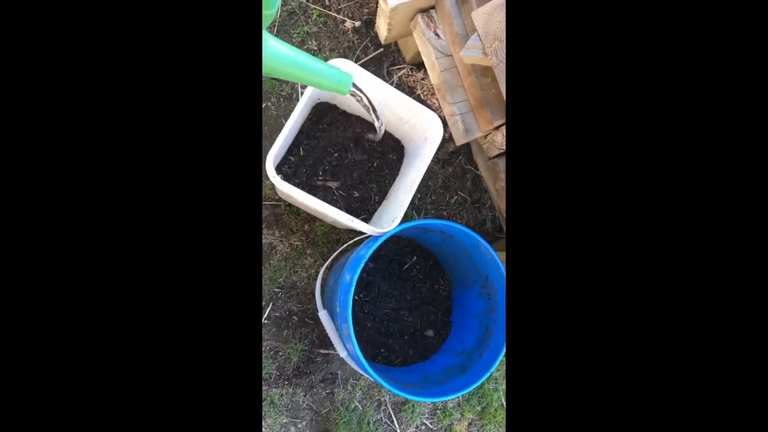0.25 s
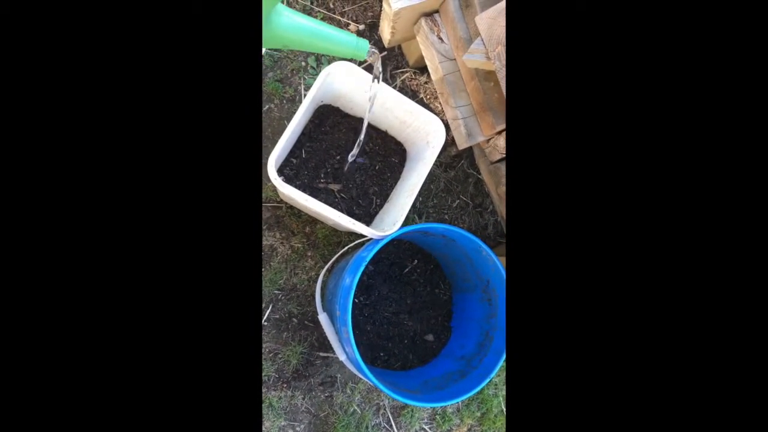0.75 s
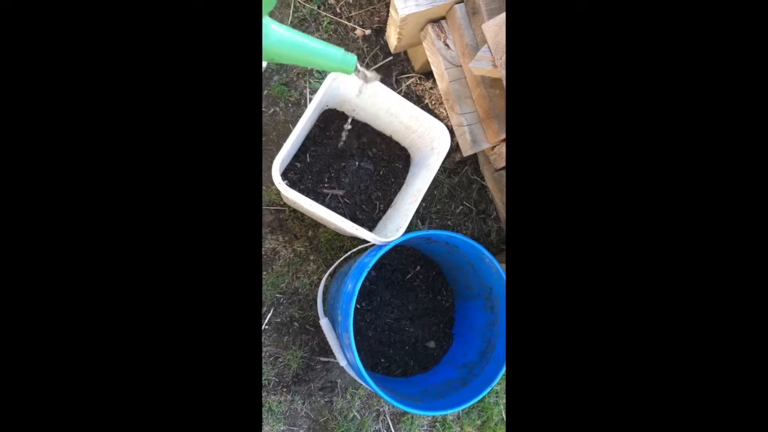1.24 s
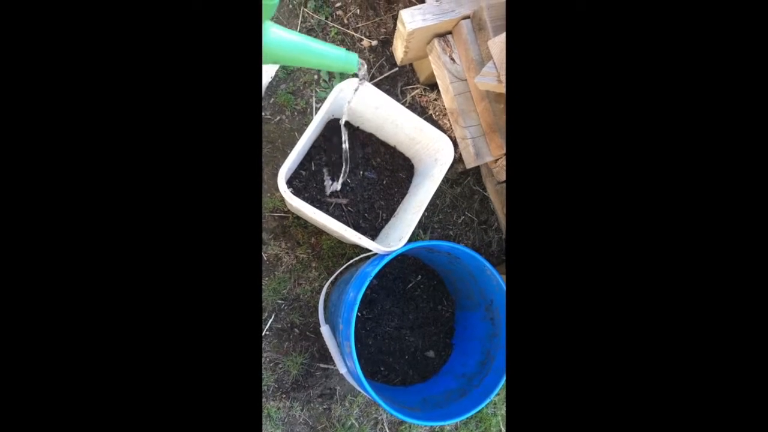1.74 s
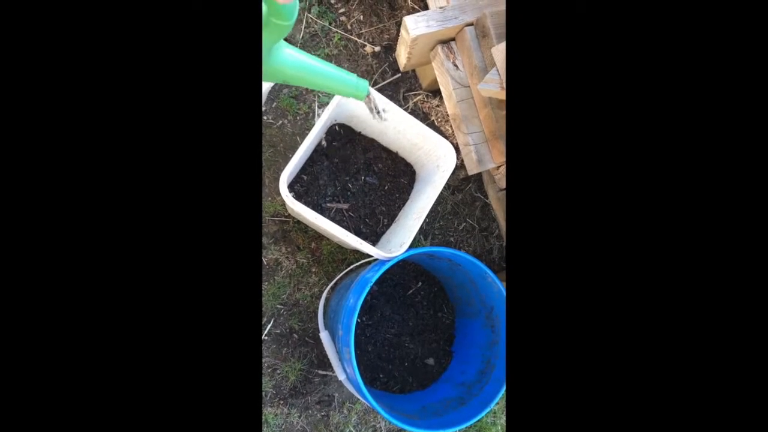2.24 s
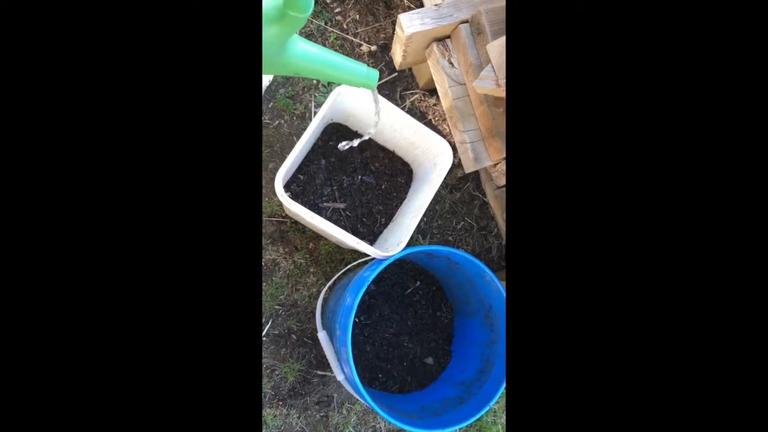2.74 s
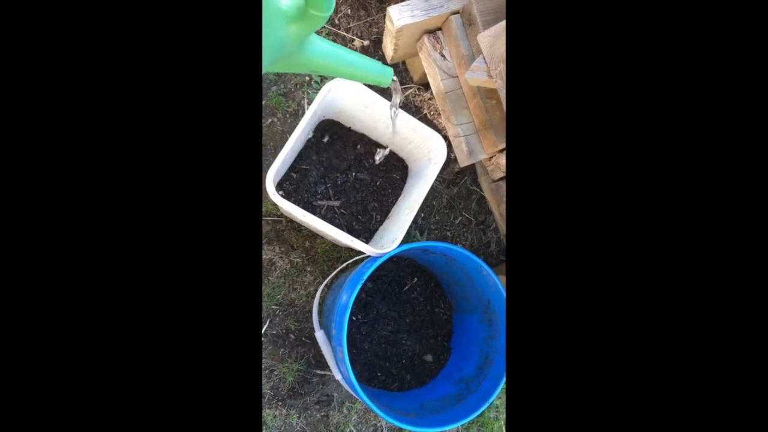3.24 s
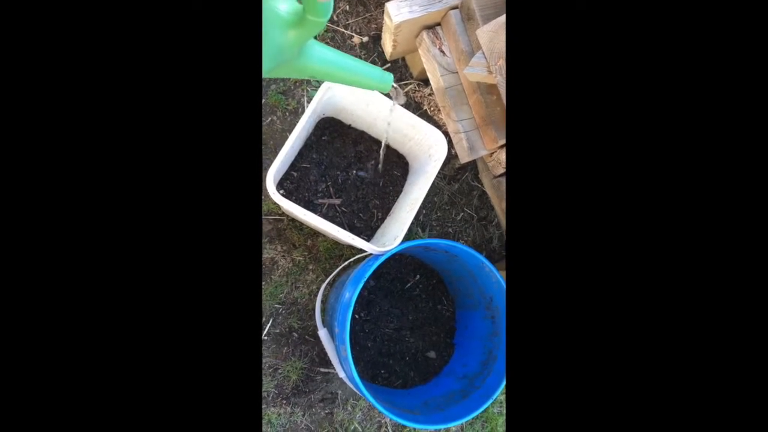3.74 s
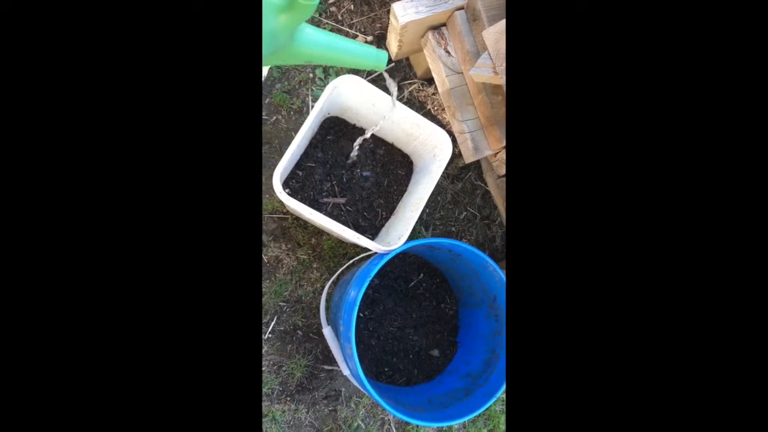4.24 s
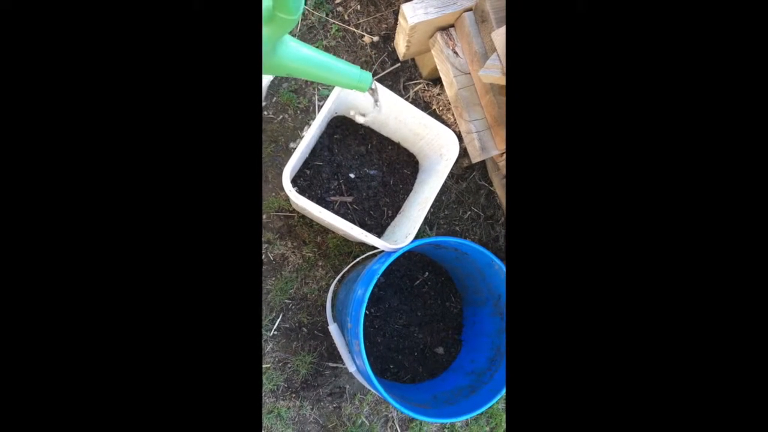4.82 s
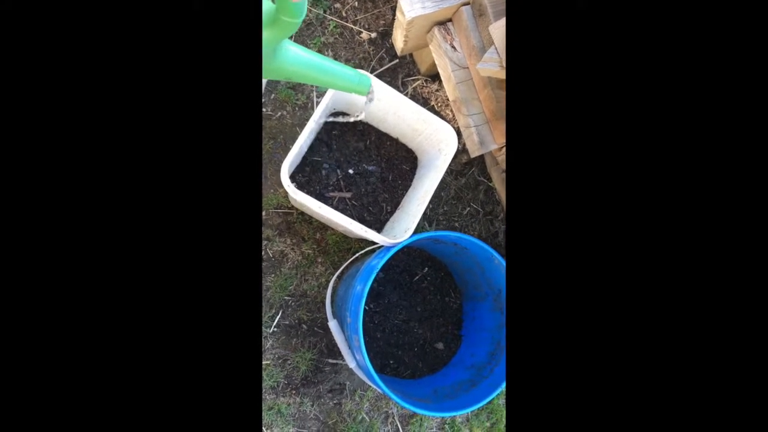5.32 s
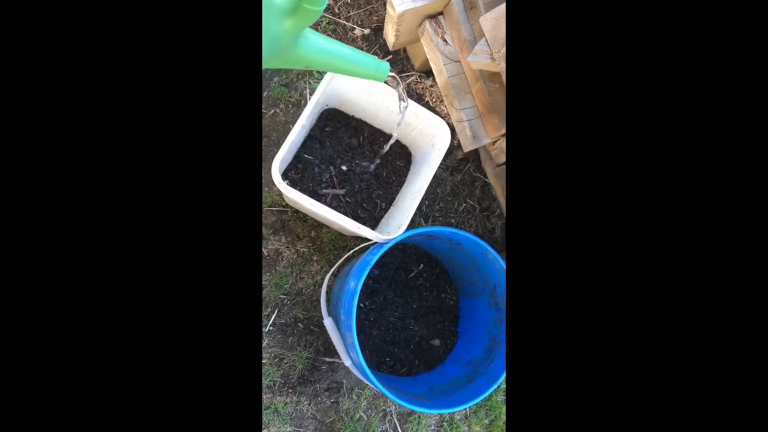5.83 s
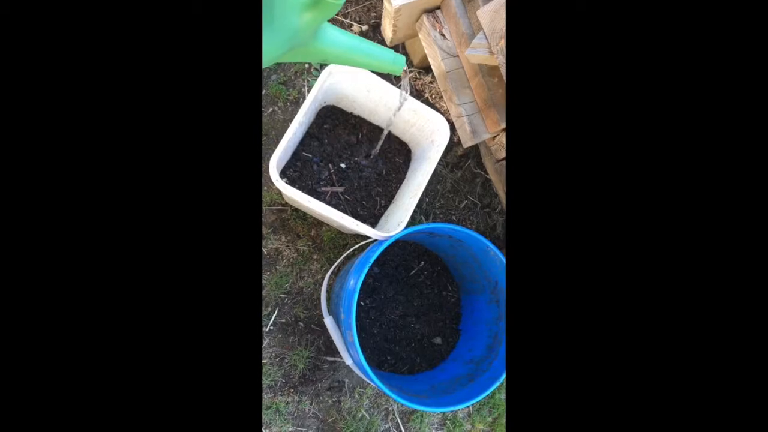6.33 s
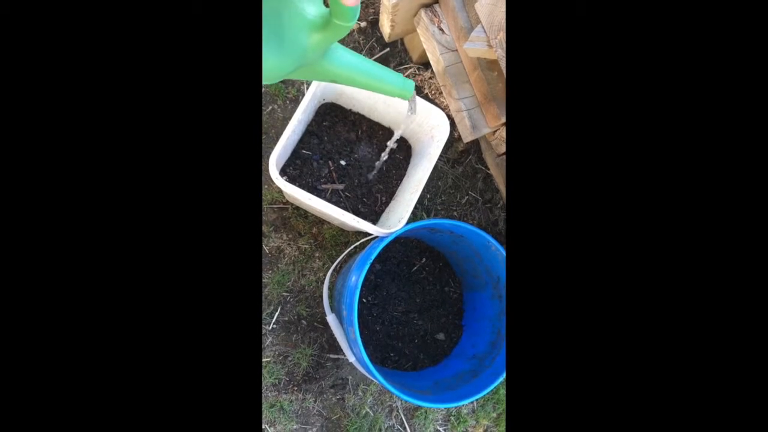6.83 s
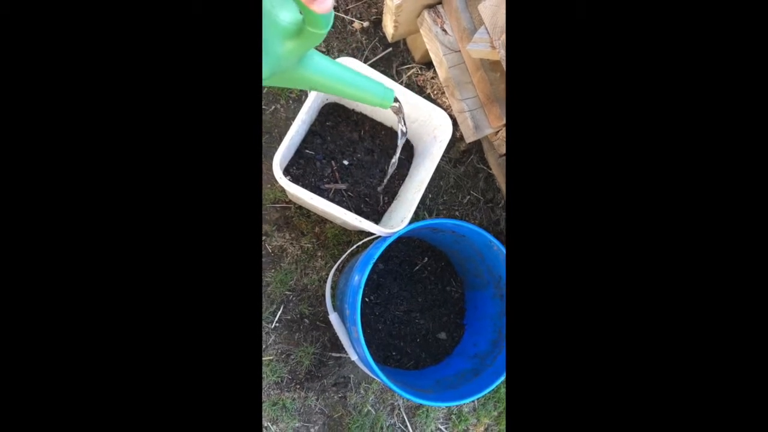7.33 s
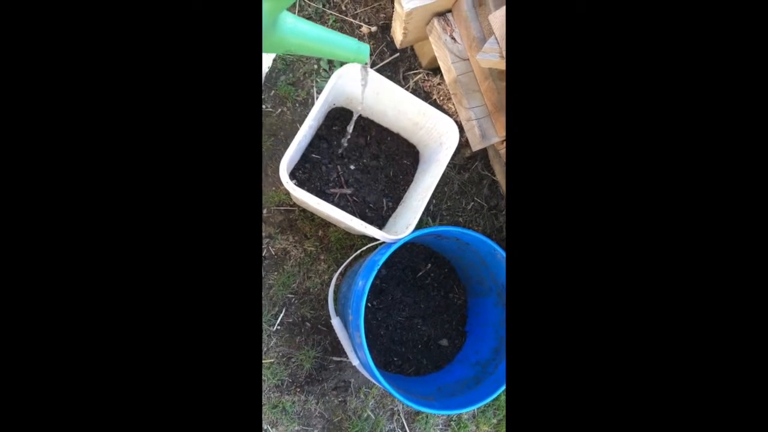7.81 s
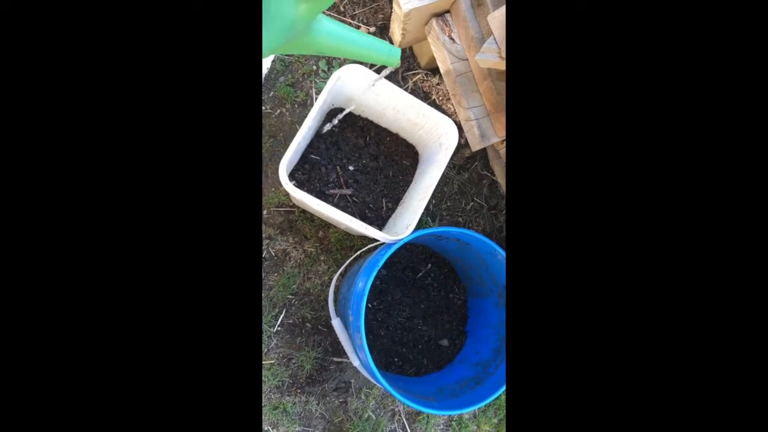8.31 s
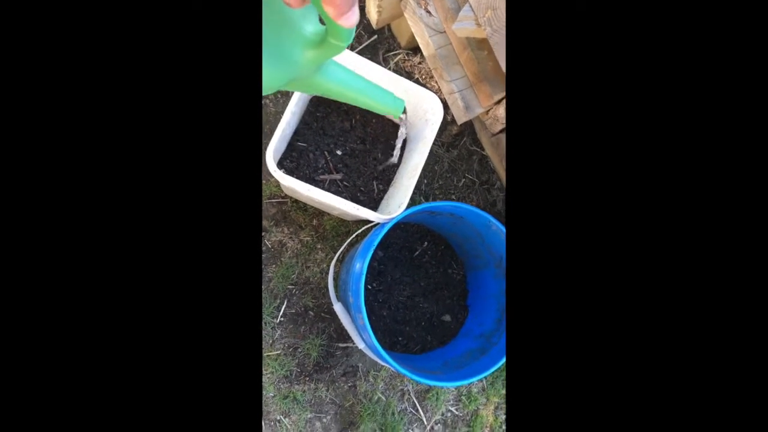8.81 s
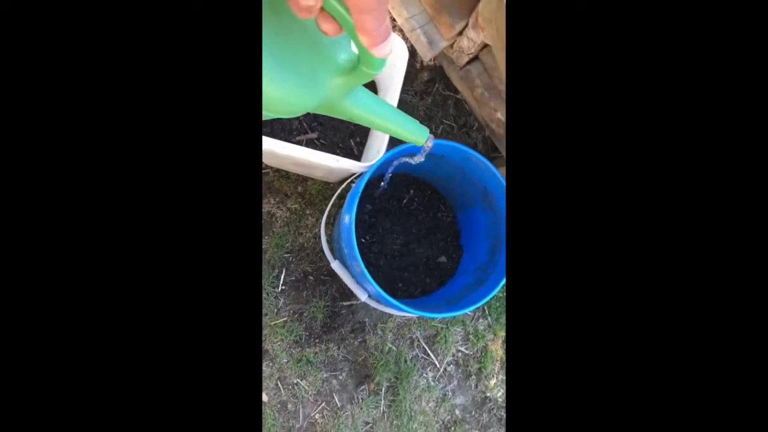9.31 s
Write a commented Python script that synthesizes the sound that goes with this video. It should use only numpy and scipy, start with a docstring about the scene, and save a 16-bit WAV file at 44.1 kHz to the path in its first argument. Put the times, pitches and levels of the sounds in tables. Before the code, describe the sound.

In a garden, about a metre from the microphone, a thin jet of water sways and breaks over wet soil in a plastic tub. It begins fairly steady, turns broken and spattering, then fuller again, with sharp splats, fizzing tiny bubbles and short dull plastic taps. Air gulps back into the can with soft hollow glugs. Low wavering rumble continues throughout.

```python
"""Outdoors, about a metre from a square plastic tub of loose soil, into which a watering can pours.
The swaying jet lands in spurts of noise-burst drops; fat drops splat, and some knock on the ringing tub wall.
Trapped bubbles are sines that fade and may slide in pitch; churned puddles are clouds of them.
Air glugs back into the can as throbbing tones that wake its hollow and leave sloshing noise.
Under it all lie a low noise rumble, a wavering hum, a higher drone and soft outdoor air."""
import sys
import numpy as np
from scipy import signal
from scipy.fft import rfft, irfft
from scipy.io import wavfile
from scipy.ndimage import uniform_filter1d

SR = 44100
rng = np.random.default_rng(int(sys.argv[2]) if len(sys.argv) > 2 else 0)


def digitize_waveform(pressure):
    """Quantize a signal to 16-bit integers and store it at the path in sys.argv[1].

    Rows of a 2-D input are taken as channels; values are limited to [-1, 1].
    """
    field = np.atleast_2d(pressure).T
    bounded = np.clip(field, -1, 1)
    quanta = np.round(bounded * 32767).astype(np.int16)
    wavfile.write(sys.argv[1], SR, quanta)


N = 421596

# modes of the plastic tub, before scatter and damping: hz, level_db, t60_s
TUB_MODES = [(516, -13, 0.046), (680, -10, 0.022), (855, 0, 0.019), (1320, 1.5, 0.014), (1591, 6.5, 0.041),
             (2470, -8.5, 0.21), (4380, -4.5, 0.041)]
# the spot where the jet lands rings higher or lower as the can sways: time_s, pitch_hz
LANDING_PITCH = [(0, 6070), (1.75, 5100), (3.0, 6200), (3.35, 7600), (4.8, 8960), (5.1, 6150), (5.6, 8200),
                 (6.0, 6400), (6.9, 7250), (7.5, 5570), (8.4, 8700), (8.9, 5030), (9.4, 8500)]
TOP_HZ = 16000  # upper edge of the microphone's band
SPLAT_S = .005  # a drop at 0 dB has the energy of rms 1 held this long


def undb(db):
    """Decibels to gain."""
    return 10 ** (np.asarray(db) / 20)


def unit(x):
    """Scale to rms 1."""
    return x / np.sqrt(np.mean(x ** 2))


def curve(rows):
    """Join (time_s, value) rows by straight lines."""
    return np.interp(np.arange(N) / SR, *np.transpose(rows))


def add(out, s, x):
    """Mix x into out from time s."""
    i = int(s * SR)
    a, b = max(i, 0), min(i + len(x), N)
    if b > a:
        out[a:b] += x[a - i:b - i]


def walk(rate):
    """Smooth random wander of rms 1, with a new target rate times a second."""
    k = int(SR / rate)
    steps = np.repeat(rng.standard_normal(N // k + 1), k)
    return unit(uniform_filter1d(uniform_filter1d(steps, k), k)[:N])


def colour(x, points, size=512):
    """Causal filter through (hz, level_db) points that keeps the power of white noise."""
    hz, db = np.transpose(points)
    f = np.maximum(np.arange(size // 2 + 1) * SR / size, 1)
    # folding the cepstrum gives the minimum-phase response
    cepstrum = irfft(np.log(undb(np.interp(np.log(f), np.log(hz), db))))
    cepstrum[1:size // 2] *= 2
    cepstrum[size // 2 + 1:] = 0
    response = irfft(np.exp(rfft(cepstrum)))
    return signal.fftconvolve(x, response / np.linalg.norm(response))[:len(x)]


def resonate(x, hz, q):
    """Two-pole band-pass, gain 1 at the centre."""
    w = 2 * np.pi * min(hz, SR * .42) / SR
    a = np.sin(w) / (2 * q)
    return signal.lfilter([a, 0, -a], [1 + a, -2 * np.cos(w), 1 - a], x)


def tremble(hz, q=0.71):
    """Half a second of quick random wobble around a rate, rms 1."""
    return unit(resonate(resonate(rng.standard_normal(SR // 2), hz, q), hz, q))


def ring(hz, t60, rise=0, attack_s=0.000067):
    """A fading sine whose pitch may slide, by the share rise per second."""
    t = np.arange(int(t60 * SR) + 2) / SR
    tone = np.sin(2 * np.pi * hz * t * (1 + rise * t / 2))
    return tone * np.exp(-np.log(1000) * t / t60) * (1 - np.exp(-t / attack_s))


def body(modes, scatter_db, detune):
    """Ring of an object; its modes are weighted and detuned afresh at each strike."""
    out = np.zeros(int(max(m[2] for m in modes) * SR) + 2)
    for hz, db, t60 in modes:
        mode = ring(hz * (1 + detune * rng.standard_normal()), t60)
        out[:len(mode)] += mode * undb(db + scatter_db * rng.standard_normal()) * rng.choice([-1, 1])
    return out


def hum(hz, waver):
    """A tone of rms 1 that wavers in pitch and level."""
    phase = 2 * np.pi * np.cumsum(hz * (1 + waver * walk(9))) / SR
    return unit(np.sin(phase) * undb(2 * walk(7)))


def background(rumble_db=-1, hum_hz=92, hum_db=-7, drone_hz=178, air_db=-43):
    """A low rumble with a wavering hum and drone, and soft outdoor air."""
    # shared level of rumble and hum: time_s, level_db
    rumble_level = [(0, -25.5), (.6, -24.5), (.8, -21.5), (1.3, -28.5), (1.85, -22), (2.1, -27.5),
                    (2.55, -28.5), (3.2, -22.5), (4.85, -26.5), (5.2, -22.5), (5.5, -21.5), (5.65, -25),
                    (6.55, -28.5), (6.83, -22.5), (7.03, -30.5), (7.4, -18), (7.8, -23), (9.56, -24.5)]
    # spectrum of the rumble: hz, level_db per Hz
    rumble_colour = [(20, -22), (32, -27), (42, -16.5), (52, 2.5), (62, -7), (76, 2), (92, -2), (108, 1.5),
                     (124, -15.5), (138, -3), (152, -9.5), (180, -11.5), (330, -32), (1500, -85.5)]
    # spectrum of the outdoor air: hz, level_db per Hz
    air_colour = [(150, 0.5), (300, 5.5), (700, -2.5), (1000, -2.5), (1600, -11), (3000, -19.5),
                  (8000, -24.5), (16000, -17)]
    # swells of the higher drone: time_s, level_db
    drone_level = [(0, -45), (3.6, -47), (4.3, -32), (5.6, -44), (8.5, -34.5)]
    rumble = unit(colour(rng.standard_normal(N), rumble_colour, size=16384))
    air = unit(colour(rng.standard_normal(N), air_colour, size=2048)) * undb(walk(11.0))
    low = undb(rumble_db) * rumble + undb(hum_db) * hum(hum_hz, .02)
    drone = hum(drone_hz, .045) * undb(curve(drone_level))
    return low * undb(curve(rumble_level)) + drone + undb(air_db) * air


def glugs(glug_db=0, bubble_t60=0.082, can_db=-7, slosh_db=-21, slosh_s=0.071, slosh_hz=300,
          wobble=0.28, wobble_hz=90):
    """Each gulp of air throbs in the can, wakes its hollow and leaves the water sloshing."""
    # air gulped into the can: start_s, bubble_hz, level_db (peak, before the gains above)
    gulps = [(.598, 280, -7.5), (0.625, 282, -20), (.668, 271, -21.5), (0.807, 295, -27),
             (1.58, 185.5, -10), (1.67, 199, -17.5), (1.976, 298, -18), (2.586, 204, -19.5),
             (3.199, 202, -11), (3.232, 198, -13.5), (3.377, 302, -14.5), (4.089, 197, -19.5),
             (4.272, 278, -15), (6.057, 285, -19.5), (8.387, 332, -16)]
    # air space of the can, before scatter: hz, level_db, t60_s
    can_modes = [(206.7, -5.5, 0.44), (285, -8, 0.36), (313, -8, 0.27)]
    out, t = np.zeros(N), np.arange(SR // 2) / SR
    for s, hz, db in gulps:
        gulp = ring(hz, bubble_t60, rise=0.11, attack_s=0.0077)
        gulp = gulp * (1 + wobble * tremble(wobble_hz)[:len(gulp)])
        hollow = body(can_modes, scatter_db=2, detune=.03)
        slosh = unit(resonate(resonate(rng.standard_normal(len(t)), slosh_hz, 5.6), slosh_hz, 1.0))
        # the slosh builds up over two bubble cycles
        slosh = slosh * np.exp(-t / slosh_s) * np.minimum(t * hz / 2, 1)
        add(out, s, undb(db + glug_db) * gulp / abs(gulp).max())
        add(out, s + 2 / hz, undb(db + can_db) * hollow / abs(hollow).max())
        add(out, s, undb(db + slosh_db) * slosh)
    return out


def tub_hollow(x, echo_db=-15, mode_db=-4):
    """Splashes scatter between the tub walls and sing faintly in its modes."""
    t = np.arange(SR // 10) / SR
    echo = rng.standard_normal(len(t)) * np.exp(-np.log(1000) * t / .05) * (t > .001)
    echoes = signal.fftconvolve(x, echo / np.linalg.norm(echo))[:N]
    # each Q follows from the mode's decay time
    modes = sum(undb(db) * resonate(x, hz, np.pi * hz * t60 / np.log(1000)) for hz, db, t60 in TUB_MODES)
    return x + undb(echo_db) * echoes + undb(mode_db) * modes


def tub_wall(knock_db=3, slap_db=-1.5, slap_hz=1400, slap_s=0.0041, thud_hz=620, thud_s=0.0051,
             wet_s=0.026):
    """Drops slap the plastic and thud in its thin wall, which rings briefly, damped by wet soil."""
    # drops on the wall, single or drumming: start_s, level_db (peak, before knock_db),
    # thud_db (thud against ring)
    knocks = [(2.428, -17, -25), (3.057, -22, -14), (3.637, -20.5, -17), (4.009, -17, -10),
              (5.065, -19, -14), (5.311, -21, 2), (5.333, -24.5, 0), (5.562, -24.5, 11),
              (5.842, -12.5, -31), (6.202, -22, -3), (6.215, -19, -2), (6.227, -23, -2), (6.246, -22, 1),
              (6.26, -21, 4), (6.295, -22, 7), (6.345, -21, -6), (6.372, -26, -3), (6.405, -25.5, -1),
              (6.457, -22.5, 8), (6.503, -24, 8), (6.532, -21, 7), (6.588, -24, -5), (6.618, -26, 1),
              (6.646, -21, 0), (6.676, -19, 6), (6.952, -12, 11), (6.984, -20, -3), (7.012, -17.5, -4),
              (8.028, -25, 11), (8.124, -20.5, 1), (8.201, -27, -1)]
    out = np.zeros(N)
    for s, db, thud_db in knocks:
        x = body(TUB_MODES, 2.5, .007)
        t = np.arange(len(x)) / SR
        splash, push = rng.standard_normal((2, SR // 4))[:, :len(x)]
        slap = resonate(splash * np.exp(-t / slap_s), slap_hz, 0.28)
        thud = resonate(resonate(push * np.exp(-t / thud_s), thud_hz, 0.71), thud_hz, 0.71)
        x = unit(x * np.exp(-t / wet_s)) + undb(slap_db) * unit(slap) + undb(thud_db) * unit(thud)
        add(out, s, undb(db + knock_db) * x / abs(x).max())
    return out


def bubbles(flow_db, bubble_db=1, swell_cycles=1.2, wobble=0.44, small_db=-3, small_hz=4600, cycles=20,
            count=1400):
    """Trapped air swells, rings and slides in pitch; small bubbles follow the flow."""
    # bubbles in puddles and in the spout: start_s, pitch_hz, level_db (peak, before bubble_db), t60_s,
    # rise (share of pitch per s), froth_db (froth against ring)
    large_bubbles = [(1.574, 1660, -19, .046, -1, 8), (1.709, 1874, -16, .067, 5.5, -3),
                     (1.9613, 508, -9.5, 0.053, 49, -18), (1.97, 2580, -7.5, 0.081, -2, -10),
                     (1.971, 3060, -5.5, .032, 11, -3), (1.982, 933, -19, 0.072, 12, -14),
                     (2.0132, 1300, -10, 0.025, 18, -5), (2.1386, 1090, -13.5, 0.013, 2, -1),
                     (2.139, 1905, -13.5, .035, 5.5, -2), (3.038, 2010, -19, 0.045, 23.5, -2),
                     (3.369, 610, -20.5, 0.029, 22, -3), (4.098, 1240, -25.5, .087, 1, -10),
                     (5.5643, 1660, -16.5, 0.043, -3, -16), (8.1444, 1780, -14.5, .035, 0, 0),
                     (8.371, 1620, -10.5, .055, 4.5, 3), (8.903, 538, -20.5, 0.047, 8, -5),
                     (9.317, 2480, -16.5, 0.082, 11, -2), (9.385, 1370, -15.5, .012, 12, -1.5)]
    big, small = np.zeros(N), np.zeros(N)
    for s, hz, db, t60, rise, froth_db in large_bubbles:
        x = ring(hz, t60, rise, attack_s=swell_cycles / hz)
        # the bubble wall wobbles as it breaks free
        x = x * (1 + wobble * tremble(340)[:len(x)])
        # its film bursts into a short froth
        froth = rng.standard_normal(SR // 4)[:len(x)] * np.exp(-np.arange(len(x)) / SR / .008)
        froth = resonate(resonate(froth, 1.4 * hz, .9), 1.4 * hz, .9)
        x = unit(x) + undb(froth_db) * unit(froth)
        add(big, s, undb(db + bubble_db) * x / abs(x).max())
    chance = rng.uniform(-0.976, 1, (count, 3))
    for s, (pitch, weight, rise) in zip(rng.uniform(0, N / SR, count), chance):
        hz = small_hz * np.exp(.8 * pitch)
        add(small, s, undb(small_db + 7 * weight) * ring(hz, 2 * cycles / hz, 4 + 5 * rise))
    return big + small * undb(flow_db)


def churn(churn_db=0, spread=0.16, size_db=6.0, rise=8, bubbles_per_s=900, fade_cycles=25):
    """Clouds of tiny bubbles swell and fade; each bubble rings briefly near the pitch of its puddle."""
    # puddles churned by the jet: start_s, end_s, pitch_hz, level_db
    puddles = [(-.03, 0.279, 7000, -36.5), (.239, 0.373, 1650, -41.5), (0.291, 0.337, 5700, -30),
               (0.671, 0.738, 2800, -42), (0.844, 0.893, 5800, -32.5), (1.159, 1.225, 5900, -31),
               (4.303, 4.358, 4750, -29), (7.99, 8.2, 1900, -42), (5.987, 6.202, 6930, -33),
               (6.594, 6.691, 3180, -37), (6.723, 7.081, 4420, -32), (7.312, 7.719, 6050, -35),
               (7.53, 8.03, 7800, -35.5)]
    out = np.zeros(N)
    for start, end, hz, db in puddles:
        cloud, length = np.zeros(N), end - start
        chance = rng.standard_normal((1000, 3))[:int(length * bubbles_per_s)]
        for k, (late, pitch, weight) in enumerate(chance):
            share = (k + .5) / len(chance)
            f = min(hz * np.exp(spread * pitch), TOP_HZ)
            size = np.sqrt(np.sin(np.pi * share)) * undb(size_db * weight)
            s = start + share * length + late / bubbles_per_s
            add(cloud, s, size * ring(f, fade_cycles / f, rise))
        out += cloud * undb(db + churn_db) * np.sqrt(length * SR / np.sum(cloud ** 2))
    return out


def jet_flow(attack_s=0.016, drain_db_per_s=154, dribble_db=-46.5, wobble_db=1.5, wobble_per_s=16):
    """Level of the water on the soil in dB: each spurt rises, holds and drains; the strongest rules."""
    # the swaying can throws the jet in spurts: start_s (lands), end_s (breaks off), level_db before wobble
    spurts = [(-0.05, 0.83, -31), (0.276, 0.343, -28.5), (0.647, 0.726, -29.5), (0.82, 1.189, -29.5),
              (1.302, 1.68, -37), (1.694, 1.7, -25), (1.814, 1.86, -31.5), (1.943, 2.167, -34),
              (2.422, 2.51, -31), (2.566, 2.597, -38), (2.836, 2.92, -32.5), (3.052, 3.096, -28),
              (3.212, 3.232, -32), (3.31, 3.554, -28), (3.6, 3.79, -31.5), (3.852, 4.36, -31),
              (4.546, 4.76, -30.5), (4.996, 5.23, -31), (5.29, 5.308, -29.5), (5.519, 5.603, -28),
              (5.828, 6.562, -32), (6, 6.304, -30), (6.558, 7.04, -30), (7.107, 7.187, -30.5),
              (7.272, 7.33, -34), (7.308, 8.026, -29.5), (8.118, 8.264, -32), (8.344, 8.44, -31.5),
              (8.55, 8.943, -31.5), (8.957, 9.138, -30), (9.26, 9.397, -31.5)]
    t = np.arange(N) / SR
    flow = np.full(N, undb(dribble_db))
    for start, end, db in spurts:
        rise = np.clip((t - start) / attack_s, 0, 1)
        flow = np.maximum(flow, rise * undb(db - drain_db_per_s * np.clip(t - end, 0, 1)))
    return 20 * np.log10(flow) + wobble_db * walk(wobble_per_s)


def smoothness(stream_share=0.49):
    """Share of the water that lands as an unbroken stream: 0 outside streams, stream_share within."""
    # stretches of smooth stream: start_s, end_s
    streams = [(-.1, 0.72), (.76, 1.18), (5.86, 6.08), (7.3, 7.71), (8.64, 8.9)]
    t = np.arange(N) / SR
    whole = sum(1. * ((t >= start) & (t < end)) for start, end in streams)
    return np.clip(stream_share * uniform_filter1d(whole, size=SR // 30), 0, 1)


def slugs(per_s=95, fade_s=0.0063, size_db=4, steady=0.21):
    """The jet necks into uneven slugs; each lands abruptly and drains. A gain of rms 1."""
    late, weight = rng.uniform(-1, 1, (2, N))[:, :int(per_s * N / SR)]
    landing = (np.arange(len(late)) + late) / per_s * SR
    hits = np.zeros(N)
    hits[np.clip(landing, 0, N - 1).astype(int)] = undb(2 * size_db * weight)
    drained = signal.lfilter([1], [1, -np.exp(-1 / (fade_s * SR))], hits)
    return unit(steady + drained / undb(size_db))


def pit(flow_db, pit_db=-9, q=6, shift_db=6.5, shift_per_s=9, full_flow_db=-30):
    """Fine spray of a full jet washes through a wet pit; its cavities sing in turn as the soil shifts."""
    # cavities the jet digs, before they shift: hz, level_db
    cavities = [(3300, -4), (4400, 5), (5500, 11.5), (6600, 0.5), (8200, 7), (12800, 0)]
    spray = rng.standard_normal(N) * undb(3 * walk(500))
    wash = sum(resonate(spray, hz, q) / np.sqrt(hz) * undb(db + shift_db * walk(shift_per_s))
               for hz, db in cavities)
    fullness_db = np.clip(flow_db - full_flow_db, -20, 0) / 2
    return unit(wash) * undb(pit_db + flow_db + fullness_db)


def patter(drops, hz=620, q=0.32):
    """Where the jet falls on the wall and on pooled water, the same drops also thud dully."""
    # level of the thuds: time_s, level_db relative to the drops' overall level
    patter_level = [(0, -11.5), (5.9, -17.5), (6.25, -6.5), (6.7, -7), (7.3, -15), (8.2, -10), (9.5, -12.5)]
    thuds = resonate(resonate(drops, hz, q), hz, q)
    return unit(thuds) * drops.std() * undb(curve(patter_level))


def stream(flow_db, smooth, stream_db=-4, grain_db=4, grains_per_s=800):
    """The unbroken jet sinks into the mud with an even, finely grained rush."""
    spray = rng.standard_normal(N) * undb(grain_db * walk(grains_per_s))
    return unit(resonate(spray, 6400, 0.21)) * smooth * undb(flow_db + stream_db)


def splat(hz, snap=0.33, q=12.5, broad=0.47, size=768):
    """One drop, centred on its snap: it crackles into crumbs, rings two air pockets, bounces off a wall."""
    t = (np.arange(size) - size // 2) / SR
    width, hardness, pocket = np.exp(.45 * rng.standard_normal(3))
    before = .6 * np.exp(-abs(t) / (.0007 * width))
    after = np.exp(-abs(t) / (.0013 * width)) + .14 * np.exp(-abs(t) / .004)
    grains = rng.standard_normal(size) * undb(4.5 * rng.standard_normal(size))
    crackle = np.where(t < 0, before, after) * grains
    crackle /= np.linalg.norm(crackle)
    crackle[size // 2] += snap * hardness * rng.choice([-1, 1])
    x = resonate(crackle, hz, q) + resonate(crackle, hz * pocket, 4 * q) + broad * crackle
    # every drop lands at its own distance from the wall
    x = x + .4 * np.roll(x, int(rng.uniform(.0003, .002) * SR))
    return x * np.sqrt(SPLAT_S * SR) / np.linalg.norm(x)


def shower(rate, size_db, spot):
    """Unevenly spaced drops that ring around the pitch of the landing spot; rms 1."""
    out = np.zeros(N)
    chance = rng.standard_normal((5000, 3))
    times = np.cumsum(np.exp(.5 * chance[:, 0])) / rate
    for s, (_, weight, pitch) in zip(times[times < N / SR], chance):
        hz = spot[int(s * SR)] * np.exp(.35 * pitch)
        add(out, s - 1 / rate, undb(size_db * min(weight, 1.5)) * splat(hz))
    return unit(out)


def jet(flow_db, lumps, drop_db=-1.0, droplet_db=-3, size_db=6.0, full_flow_db=-32):
    """A thin jet falls as separate beads; a full one adds a dense patter of droplets."""
    spot = curve(LANDING_PITCH)
    beads, droplets = shower(100, size_db, spot), shower(480, size_db, spot)
    fullness = undb(np.clip(flow_db - full_flow_db, -20, 0) / 2)
    return (undb(drop_db) * beads + undb(droplet_db) * fullness * lumps * droplets) * undb(flow_db)


def big_drops(flow_db, smooth, smooth_db=-10, drop_db=0.0, pitch_spread=0.57, count=120):
    """Fat beads of the broken jet slap the wet soil; the lesser ones grow with the flow."""
    # the fattest drops: snap_s, pitch_hz, level_db (over SPLAT_S, before the soil's colour)
    fattest = [(.596, 2400, -23.5), (.874, 6300, -21), (1.067, 15200, -16), (1.085, 14000, -19),
               (1.126, 3750, -20), (1.2327, 12400, -20.5), (1.4965, 6300, -21), (1.704, 2900, -21),
               (2.138, 13800, -16), (2.4274, 4100, -16.5), (2.452, 5700, -19), (2.5354, 5140, -20.5),
               (2.5891, 9150, -20), (2.8288, 12900, -24), (2.9043, 6550, -15.5), (3.0585, 6440, -17),
               (3.1922, 13400, -22), (3.452, 8850, -18.5), (3.4773, 7150, -17.5), (3.7576, 5400, -22),
               (4.0458, 7550, -16), (4.124, 8200, -19.5), (4.287, 3530, -21), (4.3204, 12500, -15.5),
               (4.4172, 4500, -20), (4.5463, 7200, -17), (4.6308, 8900, -15.5), (4.7626, 5050, -18),
               (4.9944, 12000, -18), (5.1188, 12300, -16.5), (5.17, 4400, -21.5), (5.212, 10100, -19.5),
               (5.515, 12400, -16), (5.536, 4660, -26), (5.8413, 7900, -14), (6.1616, 8500, -19),
               (6.2279, 5230, -17), (6.328, 3500, -23), (6.347, 12500, -15.5), (6.651, 12500, -25),
               (6.765, 9000, -21), (6.826, 12300, -18.5), (6.883, 8500, -21.5), (6.9168, 12300, -13),
               (6.948, 5430, -21), (6.9872, 12300, -16.5), (7.021, 12000, -21), (7.063, 9000, -20),
               (7.132, 12000, -19.5), (7.164, 12000, -19), (7.255, 13000, -23.5), (7.776, 13400, -24),
               (7.7955, 8550, -19), (7.9905, 7930, -24), (8.0249, 3100, -17.5), (8.125, 6470, -22.5),
               (8.125, 6500, -28.5), (8.163, 6260, -20.5), (8.173, 7500, -19), (8.1995, 3950, -20),
               (8.2495, 7300, -22), (8.2922, 11800, -15.5), (8.326, 7560, -22.5), (8.357, 7400, -21),
               (8.5536, 5240, -17.5), (8.583, 8900, -19), (8.62, 11500, -18.5), (8.914, 11600, -20.5),
               (8.977, 5200, -21.5), (9.331, 12500, -20), (9.35, 14000, -19), (9.386, 12500, -22),
               (9.413, 13700, -23), (9.4435, 14300, -19), (9.5041, 5660, -22)]
    # lesser beads pinch off at random; stray drips go on around drip_db between the spurts
    beads_per_s, bead_over_flow_db, bead_spread_db, drip_db = 9, 5.5, 1.5, -37
    out, spot, drops = np.zeros(N), curve(LANDING_PITCH), list(fattest)
    for k, (late, weight, pitch) in enumerate(rng.standard_normal((count, 3))):
        s = (k + late / 2) / beads_per_s
        i = int(np.clip(s * SR, 0, N - 1))
        db = max(flow_db[i] + bead_over_flow_db, drip_db) + smooth_db * smooth[i] + bead_spread_db * weight
        drops.append((s, spot[i] * np.exp(pitch_spread * pitch), db))
    for s, hz, db in drops:
        x = splat(hz, snap=0.6, q=2.1, broad=0.4)
        add(out, s - len(x) / 2 / SR, undb(db + drop_db) * x)
    return out


def scene():
    """Water in the tub, air in the can, rumble around."""
    # colour of fat drops striking wet soil: hz, level_db
    soil_colour = [(300, -2), (1000, -8), (3000, 2), (4500, 3), (9000, 3), (10300, 0.5), (12000, 2)]
    # colour of the jet's finer drops and stream on wet soil: hz, level_db
    jet_colour = [(300, -29.5), (1000, -5.5), (2000, -2.5), (3200, -0.5), (4600, 0), (9000, 3.5),
                  (10300, -0.5), (12000, 5), (16000, -3.5)]
    around = background() + glugs()
    flow_db, smooth = jet_flow(), smoothness()
    lumps = smooth + (1 - smooth) * slugs()
    drops = jet(flow_db, lumps) * (1 - smooth) + stream(flow_db, smooth)
    splashes = colour(big_drops(flow_db, smooth), soil_colour) + colour(drops, jet_colour)
    water = tub_hollow(splashes)
    wash = (churn() + pit(flow_db)) * np.sqrt(lumps)
    return (around + water + patter(drops) + bubbles(flow_db) + tub_wall() + wash)[None]


def record(dry):
    """The phone microphone clips at full scale; a steep low-pass then cuts the top."""
    low_pass = signal.ellip(10, .2, 70, TOP_HZ, fs=SR, output="sos")
    return signal.sosfilt(low_pass, np.clip(dry, -1, 1))


dry = scene()
out = record(dry)
digitize_waveform(out)
```